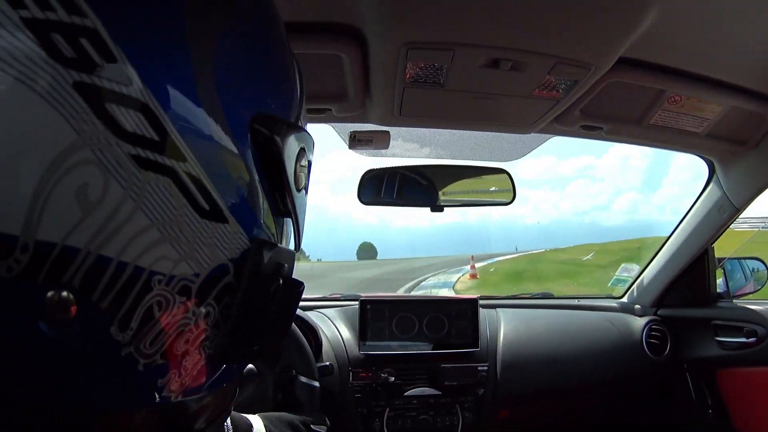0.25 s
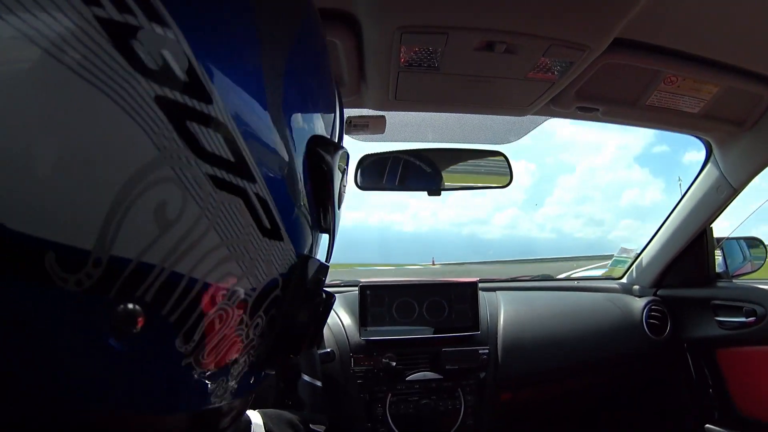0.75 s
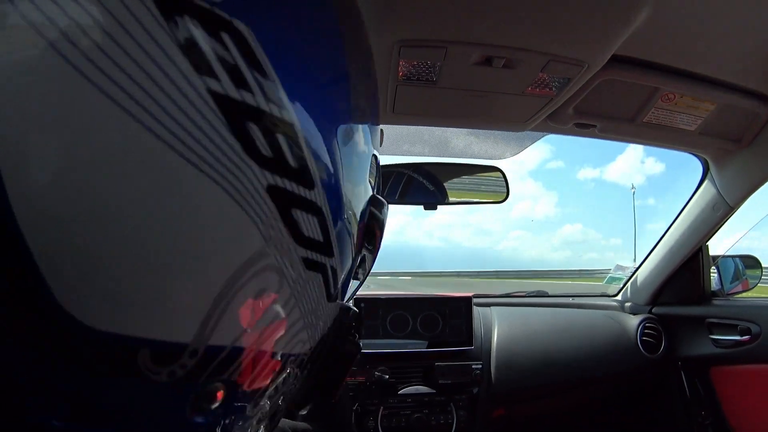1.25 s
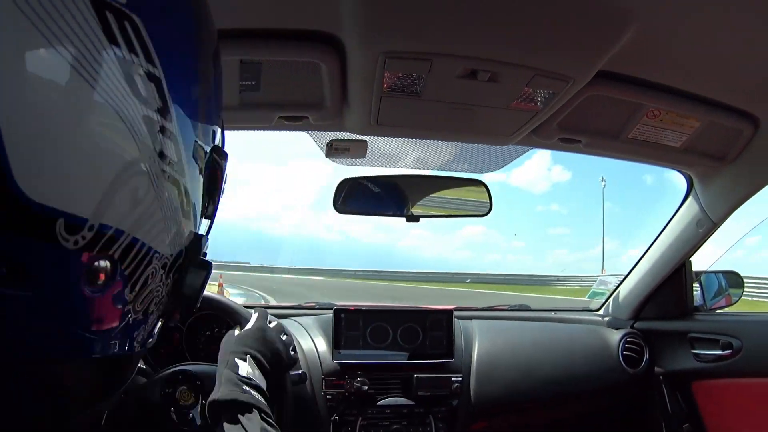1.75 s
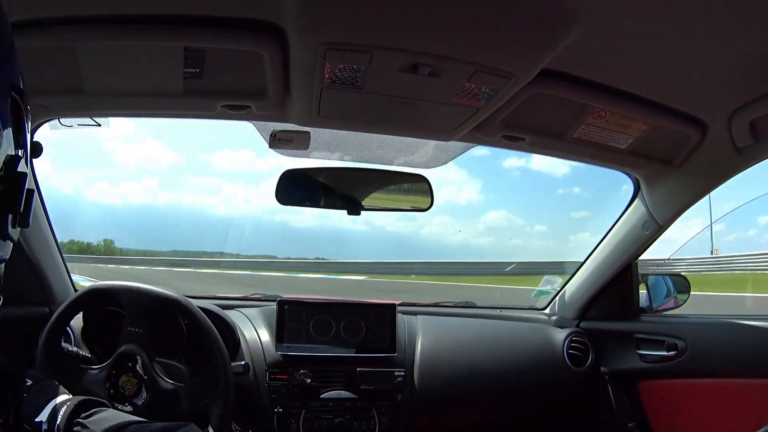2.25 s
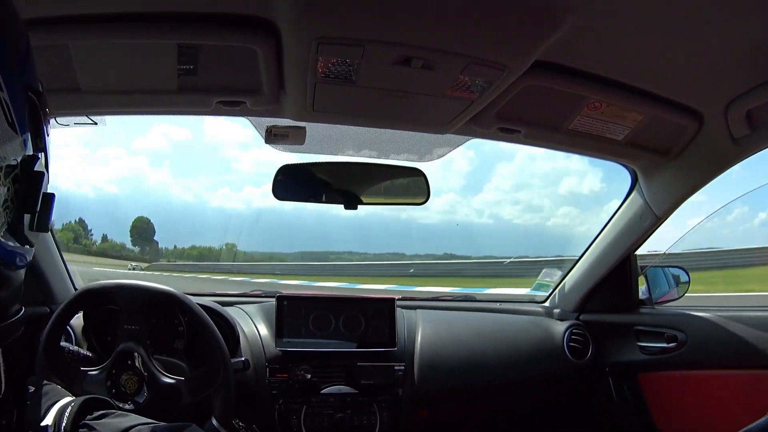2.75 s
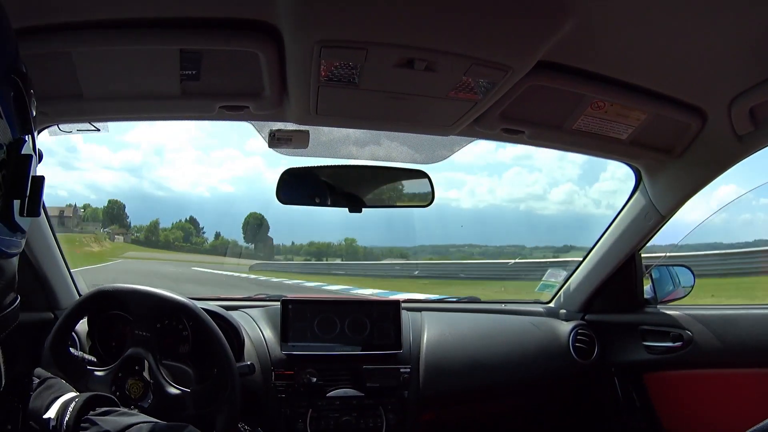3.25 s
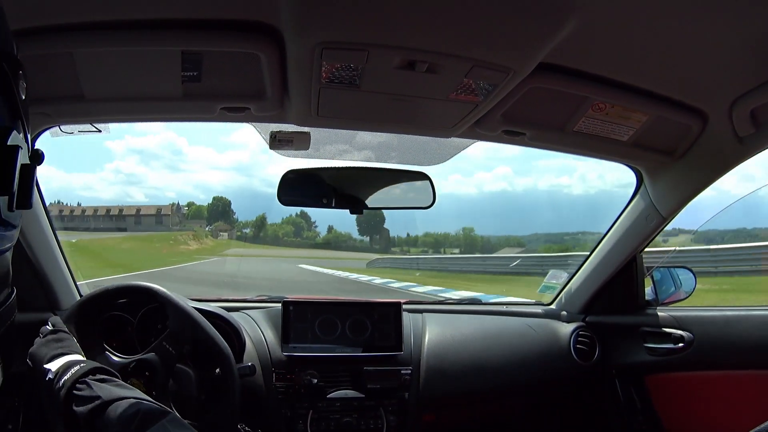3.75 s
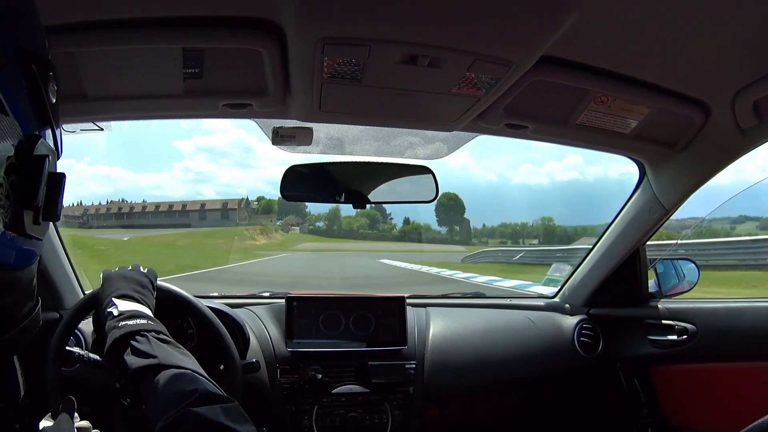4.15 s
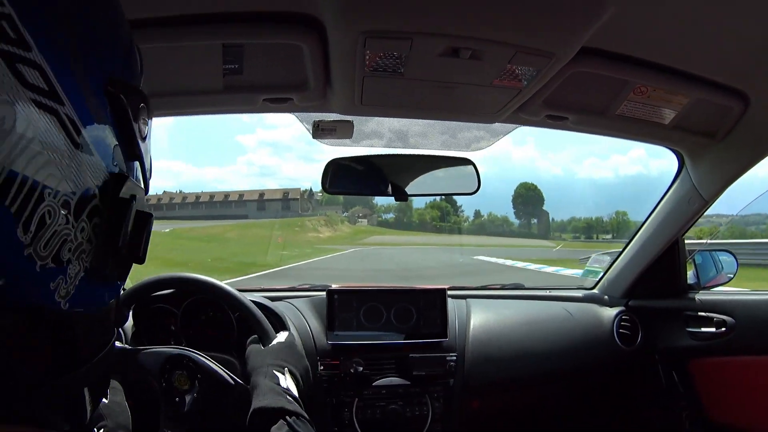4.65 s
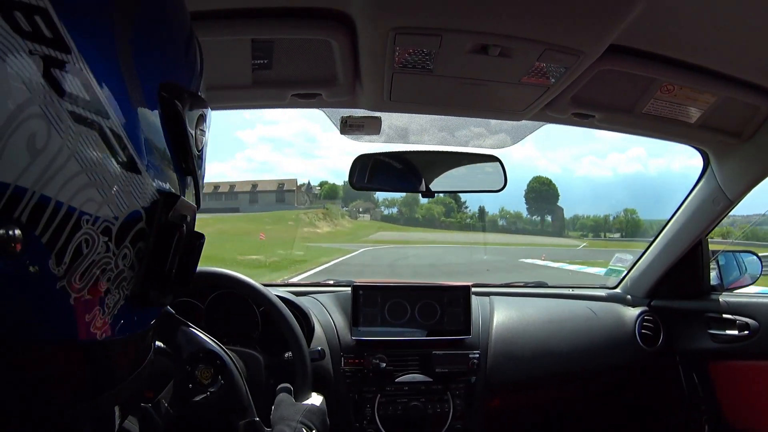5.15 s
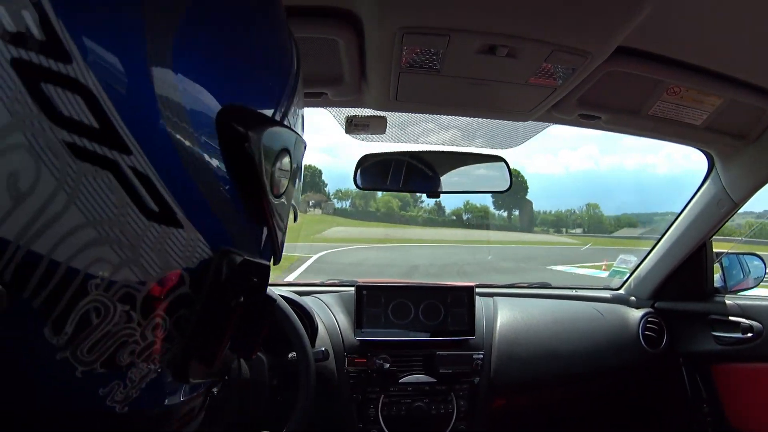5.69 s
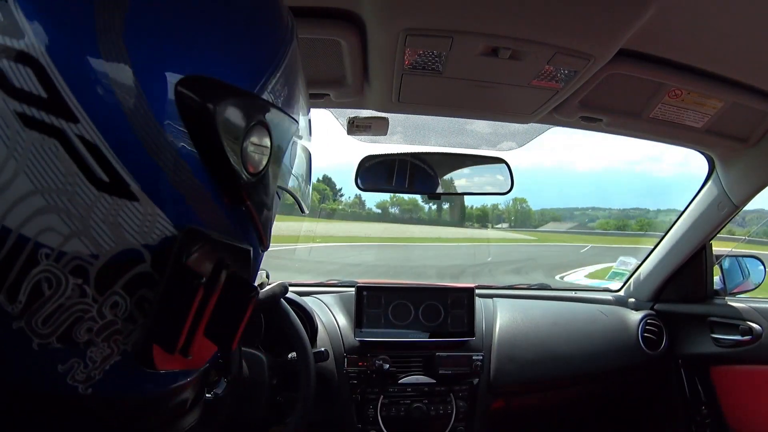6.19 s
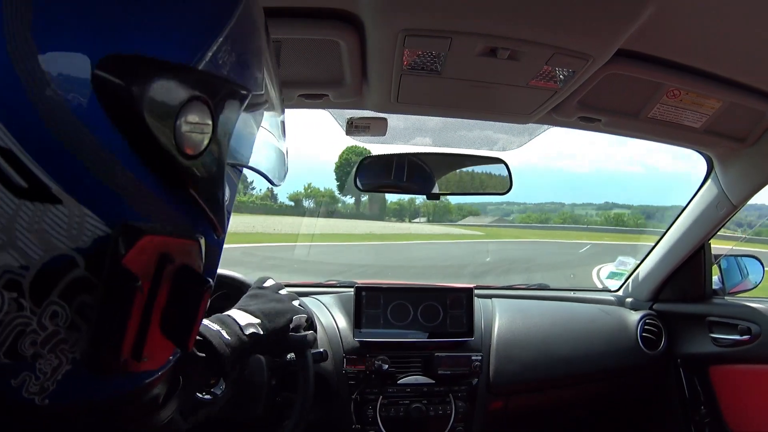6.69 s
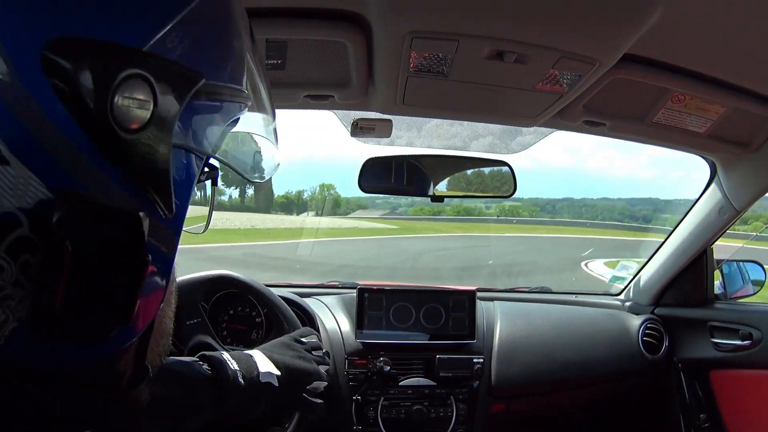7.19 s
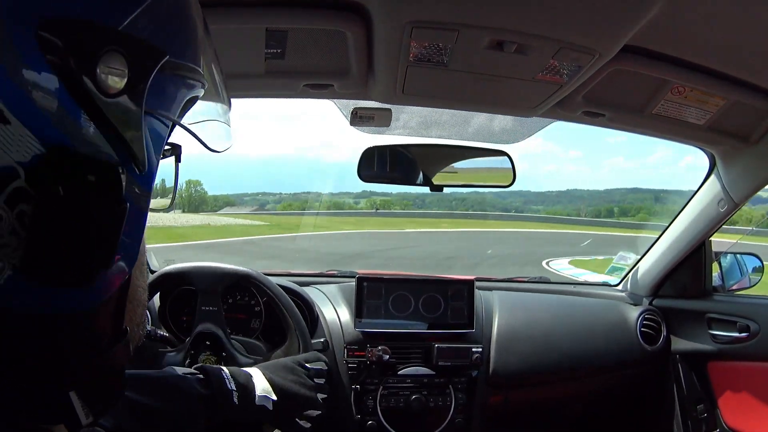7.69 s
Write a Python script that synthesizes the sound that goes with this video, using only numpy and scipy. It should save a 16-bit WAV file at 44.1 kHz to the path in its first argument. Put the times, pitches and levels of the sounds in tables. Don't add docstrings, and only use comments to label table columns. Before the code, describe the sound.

Car cabin on a circuit: low engine drone swelling and easing, constant rumble and tyre roar, rattling plastic, a jingling metal tag, bumps and gusts.

```python
import sys
import numpy as np
from scipy import signal
from scipy.fft import rfft, irfft, next_fast_len
from scipy.io import wavfile
from scipy.ndimage import uniform_filter1d, minimum_filter1d, map_coordinates

SR = 44100
rng = np.random.default_rng(int(sys.argv[2]) if len(sys.argv) > 2 else 0)


def generate_wav(sig):
    pcm = np.round(np.clip(np.atleast_2d(sig).T, -1, 1) * 32767).astype(np.int16)
    wavfile.write(sys.argv[1], SR, pcm)


def gain_from_db(level_db):
    decades = np.asarray(level_db, float) / 20
    return 10 ** decades


N = 349713
TIME = np.arange(N) / SR


def unit(x):
    return x / np.sqrt(np.mean(x ** 2) + 1e-20)


def along(points, hz):
    f, v = np.transpose(points)
    return np.interp(np.log(hz + 1), np.log(f + 1), v)


def curves(rows):
    s, *cols = np.transpose(rows)
    return [np.interp(TIME, s, c) for c in cols]


def wobble(rate_hz):
    knots = rng.standard_normal(int(N / SR * 60) + 4)
    return map_coordinates(knots, [TIME * min(rate_hz, 59)])


def swell(s, half_s):
    return np.exp(-((TIME - s) / half_s) ** 2)


def phase(hz):
    return 2 * np.pi * np.cumsum(hz) / SR


def filtered(x, response):
    m = next_fast_len(N + 8192)
    return irfft(rfft(x, m) * response(np.fft.rfftfreq(m, 1 / SR)), m)[..., :N]


def resonances(modes):
    return lambda f: sum(gain_from_db(db) * w * w / ((f - hz) ** 2 + w * w) for hz, w, db in modes)


def noise(spectrum, patchy_db, shake_db):
    z = signal.stft(rng.standard_normal(N + 512), nperseg=512)[2]
    field = uniform_filter1d(rng.standard_normal(z.shape), size=2, axis=0)
    field = uniform_filter1d(field, size=10, axis=1)
    x = signal.istft(z * gain_from_db(patchy_db * unit(field)), nperseg=512)[1][:N]
    return unit(filtered(x, lambda hz: gain_from_db(along(spectrum, hz))) * gain_from_db(shake_db))


def evened(x, span_s):
    share = 0.5
    level = uniform_filter1d(x ** 2, size=round(span_s * SR))
    return unit(x / (np.abs(level) + 1e-3) ** (share / 2))


# start_s, firing_hz, pressure_db
EXHAUST = [(0.0, 134, -9.5), (0.2, 135.3, -7.5), (0.65, 127.5, -6), (0.85, 122.6, -16.5), (0.98, 124.5, 0),
           (1.5, 125.1, -0.5), (2.1, 125, -0.5), (2.27, 127.5, -1.5), (2.6, 126.9, -0.5), (2.8, 128.2, 0.5),
           (3.3, 130.9, 2.5), (4.25, 140.1, -2.5), (4.95, 151.1, -9), (5.15, 151.9, -15.5),
           (5.5, 143, -21.5), (6.43, 128.8, -5), (7.0, 125.3, -1.5), (7.93, 124.1, -8.5)]
# start_s, load (1 = steady pull)
THROTTLE = [(0, 0.61), (.9, 0.0), (1.15, 1.1), (1.22, 1.21), (1.72, 1.63), (1.8, 0.25), (2.0, 1.27),
            (2.62, 0.85), (2.76, 1.38), (3.4, 1.11), (4.0, 1.04), (4.9, 1.03), (5.1, 0.5), (7.93, 0.011)]
# centre_s, rise_hz, half_s
FLARES = [
    (1.057, 3.206, 0.0849),
    (2.694, 3.36, 0.0507),
]
# centre_s, level_db, half_s
LIFTS = [
    (0.854, -21, 0.087),
    (1.796, -2.5, 0.11),
    (2.66, -5, 0.089),
    (5.001, -8, 0.067),
    (7.428, -13, 0.11),
    (1.162, -1.5, .03),
]
# shaft_order, level_db
ORDERS = [(3, -5.5), (4, -1.5), (5, -13.5), (6, -7.5), (7, -6.5), (8, -5.5), (9, -6), (10, -26)]
# freq_hz, gain_db
PANELS = [(180, -20), (225, 6), (300, 0), (325, -10), (376, 7.5), (424, 8), (434, -15), (462, 8),
          (500, -3.5), (520, -3.5), (545, 0), (592, 2), (606, -15.5), (800, -21)]


def engine():
    boom_hz, boom_width_hz, boom_db = 134.56, 20, -13.5
    firing_hz, pressure_db = curves(EXHAUST)
    firing_hz = firing_hz + sum(rise_hz * swell(s, half_s) for s, rise_hz, half_s in FLARES)
    pressure_db = pressure_db + sum(db * swell(s, half_s) for s, db, half_s in LIFTS)
    throttle, = curves(THROTTLE)
    off_hz = firing_hz - boom_hz
    shaft_hz = firing_hz / 2
    turn = phase(shaft_hz) + 0.04 * wobble(15)

    tone_db = boom_db + pressure_db - 20 * np.log10(1 + (off_hz / boom_width_hz) ** 2)
    tone = np.sqrt(2) * gain_from_db(tone_db + 0.45 * wobble(10)) * np.sin(2 * turn)

    upper_db = -30.5 + 0.6 * off_hz + 0.23 * pressure_db
    load = np.sqrt(2) * gain_from_db(upper_db + 2.5 - 9.3 * (1.5 - throttle))
    upper = []
    for k, db in ORDERS:
        level = gain_from_db(db + along(PANELS, k * shaft_hz) + 1.5 * wobble(6.5))
        upper.append(level * np.sin(k * turn + 0.3 * wobble(9)))

    throb = gain_from_db(-22 - 10 * throttle + 5.2 * wobble(3.8)) * np.sin(turn + 0.5 * wobble(7.3))
    across = sum(upper[3:6:2]) - sum(upper[1:5:3])
    return tone + load * sum(upper) + throb, -0.15 * tone + 0.22 * load * across


# centre_s, half_s, peak_db, hum_hz, octave_db
DRIVELINE = [(0.0, 0.078, -15, 229.4, -25.5), (0.675, 0.25, -27.5, 220.8, -46),
             (1.081, 0.048, -31, 236, -37.5), (1.392, 0.245, -24.5, 231.1, -33),
             (1.67, 0.048, -28, 228, -29), (1.999, 0.061, -20, 233, -31), (2.298, 0.2, -29, 236, -34.5),
             (2.854, 0.28, -26, 231.6, -39.5), (3.347, 0.12, -29, 255, -54), (3.612, 0.2, -35.5, 228, -40),
             (4.102, 0.34, -27, 224, -41.5), (4.654, 0.31, -18.5, 237.6, -48),
             (5.164, 0.22, -25.5, 249.7, -43.5), (5.719, 0.33, -23.5, 233.1, -40),
             (6.037, 0.085, -35.5, 221.8, -57), (6.254, 0.13, -23, 231.5, -32),
             (6.51, 0.041, -25.5, 208, -45), (7.022, 0.044, -30, 208, -40), (7.299, 0.24, -29.5, 197, -29),
             (7.721, 0.18, -30.5, 230, -44), (7.909, 0.047, -33.5, 206, -22)]


def driveline():
    s, half_s, db, hz, octave_db = np.transpose(DRIVELINE)
    shapes = np.array([np.exp(-np.abs((TIME - a) / h) ** 3) for a, h in zip(s, half_s)])
    turn = phase(np.interp(TIME, s, hz)) + 0.15 * wobble(21)
    hum = (gain_from_db(-44.5) + gain_from_db(db) @ shapes) * gain_from_db(2.1 * wobble(16)) * np.sin(turn)
    octave = gain_from_db(octave_db) @ shapes * gain_from_db(1.8 * wobble(14)) * np.sin(2 * turn)
    return np.sqrt(2) * (hum + octave)


# freq_hz, width_hz, level_db
SHELL = [
    (750, 30, 1.5),
    (884, 41, 1.5),
    (1470, 33, -10.5),
]


def shell():
    throttle, = curves(THROTTLE)
    return gain_from_db(-47 + 4 * throttle) * unit(filtered(rng.standard_normal(N), resonances(SHELL)))


# start_s, coarseness_db, heave_db
ROAD = [(0.0, 3.5, 1.5), (0.5, 4, 2.5), (0.62, 0, 4), (0.88, -0.5, 3.5), (1.15, -0.5, 1.5),
        (1.85, 1.5, -0.5), (2.2, 5, -1), (2.48, 2.5, 4.5), (2.65, -2, -1), (2.85, 2.5, -0.5), (3.7, 1, -2),
        (4.0, 1.5, 1), (4.25, 2, -1), (4.75, 3, 0), (5.3, 5.5, 2), (5.48, 0.5, -1.5), (5.72, 4, -2.5),
        (6.2, 0.5, -0.5), (7.93, 2.5, 0)]
# centre_s, roar_db, half_s
ROAR_SHIFTS = [
    (.78, -2, .15),
    (1.887, -4.5, 0.12),
    (2.7, -2, 0.061),
    (7.92, 2.5, .04),
]
# freq_hz, level_db
RUMBLE = [(10, -48.5), (20, -1.5), (38, 4), (50, -2), (62, -5), (85, -5.5), (120, -9), (150, -16.5),
          (200, -80)]
# freq_hz, level_db
BODY = [(100, -44), (140, -2.5), (170, 0), (225, 1.5), (265, -4.5), (305, -3), (350, -9), (420, -55.5)]
# freq_hz, level_db
ROAR = [(300, -60), (360, 5.5), (530, 0), (610, -3), (745, 1), (830, -6), (905, -2.5), (1050, -9.5),
        (1500, -21), (2200, -64)]
# freq_hz, level_db
RUSH = [(800, -6.5), (1300, 3.5), (2000, -2.5), (3000, -7.5), (5500, -12.5), (7500, -25.5), (10600, -29),
        (11200, -27.5)]
# freq_hz, level_db
BOOM = [(12, -49), (30, -33.5), (55, -5), (80, 9), (105, 2.5), (130, -34), (150, -10.5), (200, -11),
        (300, -10.5), (400, -59)]
# freq_hz, level_db
CROSS = [(280, -30.5), (350, 4.5), (480, 2.5), (600, 1), (1020, -5.5), (1200, -7), (3000, -21), (7000, -37),
         (11200, -52)]


def road():
    coarse_db, heave_db = curves(ROAD)
    roar_shift_db = sum(db * swell(s, half_s) for s, db, half_s in ROAR_SHIFTS)
    bumps = 0.5 * wobble(11) + 0.36 * wobble(30)

    low = gain_from_db(-16.5 + heave_db) * evened(noise(RUMBLE, -1.5, 0.48 * bumps), 0.12)
    low += gain_from_db(-24.5 + 0.38 * coarse_db) * noise(BODY, -1.0, 0.45 * bumps)

    high = gain_from_db(-31 + 0.69 * coarse_db + roar_shift_db) * noise(ROAR, 2.5, 0.4 * bumps)
    high += gain_from_db(-41.5 + coarse_db) * noise(RUSH, 2.0, bumps)
    high *= 1 + 0.06 * np.cos(phase(curves(EXHAUST)[0]))

    side = gain_from_db(-22 + 0.4 * coarse_db + 0.6 * heave_db) * noise(BOOM, 3.0, 0.8 * bumps)
    side += gain_from_db(-37.5 + coarse_db) * noise(CROSS, 0.5, 1.1 * bumps)
    side += 0.08 * high
    return low + high, filtered(side, lambda hz: 1 / (1 + (hz / 7000) ** 8) + 0.29) / 1.27


# start_s, level_db
HOWL = [(0.0, -21.5), (0.55, -24), (0.68, -28.5), (1.15, -27), (1.7, -26.5), (1.85, -50), (2.1, -32),
        (2.5, -40.5), (3.0, -34.5), (5.2, -36), (5.9, -26.5), (6.15, -22), (6.6, -26.5), (7.1, -23),
        (7.93, -26.5)]
# freq_hz, width_hz, level_db
TREAD = [
    (414, 74, -12),
    (478, 22, -5.5),
]
# start_s, outer_hz, outer_db, inner_hz, inner_db
SCRUB = [
    (5.9, 287.3, -58, 507.7, -53),
    (6.3, 297.9, -33.5, 503, -30),
    (7, 320.4, -42, 486.6, -28),
    (7.7, 335, -29, 478, -31),
    (7.93, 344, -49, 474.4, -45),
]


def tyres():
    db, = curves(HOWL)
    howl = filtered(rng.standard_normal((2, N)), resonances(TREAD))
    mid, side = gain_from_db(db - 4.5) * evened(howl, 0.054)
    outer_hz, outer_db, inner_hz, inner_db = curves(SCRUB)
    outer = phase(outer_hz) + 0.5 * wobble(9.9)
    mid += gain_from_db(outer_db + 3.1 * wobble(9)) * (np.sin(outer) + 0.32 * np.sin(2 * outer))
    inner = gain_from_db(inner_db + 0.92 * wobble(5.8)) * np.sin(phase(inner_hz) + 0.5 * wobble(8.5))
    return mid + inner, 0.5 * side + 0.1 * mid + 0.4 * inner


# start_s, burst_db, knock_db, ring_hz, ring_db
TICKS = [(0.022, -22, -40, 3000, -33), (0.317, -21, -35, 5400, -26), (0.919, -28, -29, 3290, -42),
         (1.005, -38, -22, 900, -28), (1.0995, -21, -25, 4549, -44), (1.7545, -27, -29, 2800, -26),
         (1.762, -32, -40, 3400, -32), (1.991, -24, -38, 4500, -34), (2.008, -29, -36, 2900, -35),
         (2.086, -28, -37, 2703, -36), (2.1448, -13, -18, 3060, -20), (2.155, -30, -30, 6400, -31),
         (2.2045, -16, -16, 3800, -28), (2.2585, -23, -36, 6100, -28), (2.4443, -28, -28, 2170, -33),
         (2.5321, -36, -26, 1600, -36), (2.568, -35, -30, 5000, -42), (2.6155, -26, -30, 2700, -34.5),
         (4.359, -34, -36, 3500, -38), (4.4862, -33, -29, 1520, -38), (4.8753, -31, -28, 1750, -35),
         (5.266, -27, -26, 1640, -33), (5.309, -36, -22, 997, -23), (5.342, -25, -28, 2500, -40),
         (5.372, -20, -10, 1000, -16), (5.408, -38, -26, 1500, -34), (5.469, -29, -22, 2100, -32),
         (6.261, -41, -34, 4500, -40), (6.975, -30, -23, 3220, -35), (7.458, -38, -24, 700, -29)]


def trim():
    padded_below_hz, crisp_hz = 2200, 5000
    out, t = np.zeros(N + SR), np.arange(SR // 4) / SR
    grit = rng.standard_normal((len(TICKS), 2, len(t)))

    def band(order, low_hz, high_hz, x):
        return signal.sosfilt(signal.butter(order, [low_hz, high_hz], "band", fs=SR, output="sos"), x)

    bright = band(4, 800, 6500, grit[:, 0])
    padded = band(2, 800, 3000, grit[:, 0])
    dull = band(2, 350, 1000, grit[:, 1])
    for i, (s, db, knock_db, hz, ring_db) in enumerate(TICKS):
        wide = grit[i, 0]
        top = padded[i] if hz < padded_below_hz else bright[i]
        burst = 0.33 * gain_from_db(db) * (unit(top) + 0.87 * min(1, hz / crisp_hz) ** 2 * wide)
        knock = 0.86 * gain_from_db(knock_db) * unit(dull[i])
        fuzz = 0.00006 * hz * np.cumsum(wide)
        ring = gain_from_db(ring_db - 60 * t / 0.046) * np.sin(2 * np.pi * hz * t + fuzz)
        tick = (burst + knock) * gain_from_db(-60 * t / 0.06) + ring
        out[round(s * SR):][:len(t)] += tick * (1 - np.exp(-t / 0.0013))
    return out[:N]


# start_s, length_s, peak_db, freq_hz (negative = outward first)
FLAPS = [
    (.2213, .0062, 2.5, 225),
    (.2258, .009, 0, -125),
    (4.347, .0040, 6.5, 440),
    (4.3500, .0095, 3.5, 235),
    (5.3102, .0042, 2.5, 310),
    (5.4655, .009, 1.5, 150),
]


def flaps():
    out = np.zeros(N)
    for s, length_s, db, hz in FLAPS:
        u = np.clip((TIME - s) / length_s, 0, 1)
        out -= gain_from_db(db) * np.sin(np.pi * u) ** 1.5 * np.sin(2 * np.pi * hz * length_s * u)
    return out


# start_s, upper_pair_db, lower_pair_db
JINGLE = [(.2583, -51, -60), (0.3163, -54.5, -50), (0.392, -39.5, -54), (.6474, -52, -55),
          (1.099, -55, -52), (1.3076, -54, -43), (1.8195, -46.5, -46), (1.958, -41.5, -44),
          (2.0145, -49.5, -36), (2.025, -43.5, -46), (2.0674, -37, -35), (2.1447, -47.5, -52),
          (2.2, -35.5, -37), (2.236, -33, -29), (2.418, -44, -38.5), (2.4603, -40.5, -43),
          (2.478, -39.5, -52), (2.535, -54, -56), (2.616, -43.5, -36.5), (2.628, -28, -22),
          (2.736, -40.5, -34), (2.775, -52, -51), (2.891, -44, -53), (2.9302, -25.5, -23.5),
          (3.005, -52.5, -44), (3.045, -53, -47), (4.556, -45, -33.5), (4.6009, -53, -49),
          (4.6169, -57, -47), (4.738, -46, -60), (5.048, -43, -28), (5.085, -48.5, -38), (5.1961, -50, -52),
          (5.2445, -47.5, -43), (5.362, -46.5, -51), (5.666, -40.5, -38), (5.691, -34, -30),
          (5.725, -45.5, -47), (5.7884, -35.5, -38), (5.9136, -43, -44), (5.9546, -33.5, -32),
          (6.245, -52.5, -54), (6.26, -29, -24), (6.412, -45.5, -40), (6.4777, -56, -54),
          (6.5331, -51.5, -54), (6.6254, -52, -59), (6.724, -48, -37), (6.794, -35, -38),
          (6.9247, -49, -56), (7.0179, -47, -49), (7.156, -40, -52), (7.7356, -49.5, -47)]
# delay_s, level_db
SWING = [
    (0, 1),
    (.006, -8),
    (0.013, -8.5),
    (.027, -21),
]
# freq_hz, level_db, t60_s
TAG = [
    (8150, -7, .035),
    (8425, -2.5, .042),
    (10355, -4.5, .055),
    (10405, -3.5, .055),
    (6450, -18, .04),
    (9350, -20, .03),
]


def tag():
    scatter, sway_db = 0.3, 3
    out, t = np.zeros(N + SR), np.arange(SR // 10) / SR
    rise = 1 - np.exp(-t / 0.0024)
    for s, upper_db, lower_db in JINGLE:
        for delay_s, loss_db in SWING:
            late, tilt = rng.uniform(-1, 1, 2)
            high_db = upper_db + loss_db + sway_db * tilt
            low_db = lower_db + loss_db - sway_db * tilt
            ring = np.zeros(len(t))
            for hz, mode_db, t60_s in TAG:
                a, b = rng.standard_normal(2)
                db = (high_db if hz > 10000 else low_db) + mode_db + 2 * a
                ring += gain_from_db(db - 60 * t / t60_s) * np.sin(2 * np.pi * hz * (1 + 0.0018 * b) * t)
            crack = gain_from_db(high_db - 2.5 - 60 * t / 0.011) * np.diff(rng.standard_normal(len(t) + 1))
            start = round((s + delay_s * (1 + scatter * late)) * SR)
            out[start:][:len(t)] += ring * rise + crack
    return out[:N]


# start_s, length_s, peak_db, centre_hz
GUSTS = [(0.413, 0.02, -14, 110.3), (0.522, 0.0073, -20, 200.3), (1.064, 0.025, -11, 80),
         (2.084, 0.055, -5, 90), (4.363, 0.064, -7.5, 150.4), (4.934, 0.044, 6.5, 248),
         (5.085, 0.015, -11.5, 120.4), (5.265, 0.045, -11, 120), (5.316, 0.027, -11, 200),
         (5.356, 0.04, -6, 450), (5.45, 0.018, -5, 250), (5.464, 0.02, 3, 400), (5.489, 0.048, -4.5, 350),
         (5.702, 0.016, -2.5, 100)]


def gusts():
    out, f = np.zeros(N + SR), np.fft.rfftfreq(4096, 1 / SR)
    for s, length_s, db, hz in GUSTS:
        eddy = rfft(rng.standard_normal(4096))
        u = np.arange(round(length_s * SR)) / (length_s * SR)
        turbulence = irfft(eddy * f / hz / (1 + (f / hz) ** 4.5))[:len(u)]
        slap = np.sin(np.pi * u ** 0.8) ** 1.5 * turbulence
        out[round(s * SR):][:len(u)] += gain_from_db(db) * slap / np.abs(slap).max()
    return out[:N]


# start_s, freq_hz, level_db, t60_s
PINGS = [
    (2.208, 722, -10, 0.031),
    (2.2595, 4000, -26.5, 0.063),
    (2.2612, 4280, -35, 0.04),
    (6.262, 2930, -38, 0.26),
]


def fastener():
    out = np.zeros(N)
    for s, hz, db, t60_s in PINGS:
        t = TIME - s
        out += (t > 0) * gain_from_db(db - 60 * np.abs(t) / t60_s) * np.sin(2 * np.pi * hz * t)
    return out


# start_s, level_db, freq_hz
THUDS = [
    (5.26, -12, 82.4),
    (5.322, -7, 106.3),
    (5.452, -13.5, 98.6),
    (7.328, -7, 54.9),
]


def suspension():
    out, peak_s = np.zeros(N), 0.013
    for s, db, hz in THUDS:
        t = np.clip(TIME - s, 0, 1)
        out += gain_from_db(db) * t / peak_s * np.exp(1 - t / peak_s) * np.sin(2 * np.pi * hz * t)
    return out


def scene():
    motor_mid, motor_side = engine()
    road_mid, road_side = road()
    tyre_mid, tyre_side = tyres()
    ticks, metal = trim() + fastener(), tag()
    mid = motor_mid + driveline() + shell() + road_mid + tyre_mid + suspension() + ticks + metal
    side = motor_side + road_side + tyre_side + 0.3 * np.roll(ticks, 30) + flaps() + gusts()
    side += 0.08 * metal + 0.25 * np.imag(signal.hilbert(metal))
    return np.array([mid + side, mid - side])


# start_s, difference_dip_db, sum_dip_db, hold_s
DUCKS = [
    (4.956, -17, -3.5, 0.05),
    (5.321, -1, -7.5, 0.062),
    (5.380, 0, -8, .05),
    (5.389, -11, -1.5, 0.045),
    (5.523, -31, -1, 0.055),
]


def wind_filter(pair):
    dip_db = np.zeros((2, N))
    for s, side_db, mid_db, hold_s in DUCKS:
        dip_db += np.outer([mid_db, side_db], (TIME > s) / (1 + (np.abs(TIME - s) / hold_s) ** 4))
    ducked = filtered(pair, lambda hz: [hz / (hz + 60), 1 / (1 + (hz / 1500) ** 2)])
    return pair + ducked * (gain_from_db(uniform_filter1d(dip_db, size=90, axis=1)) - 1)


def roll_off(x):
    return signal.sosfilt(signal.butter(12, 11760, fs=SR, output="sos"), x)


def record(dry):
    mid, side = wind_filter(np.array([dry[0] + dry[1], dry[0] - dry[1]]) / 2)
    need = np.minimum(1, 0.5 / (np.abs(mid) + 1e-9))
    mid = mid * 0.95 * uniform_filter1d(minimum_filter1d(need, size=400), size=300)
    x = np.array([mid + side, mid - side])
    x = x / (1 + np.abs(x / 0.99) ** 16) ** (1 / 16)
    mix = filtered(x, lambda hz: hz < 11050)
    return roll_off(mix)


dry = scene()
out = record(dry)
generate_wav(out)
```